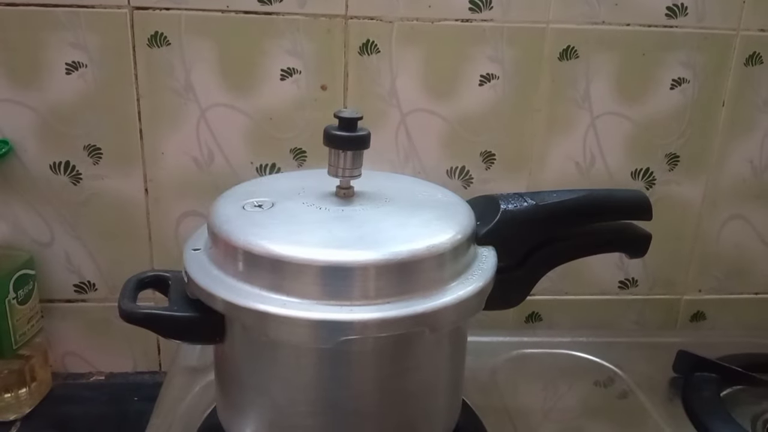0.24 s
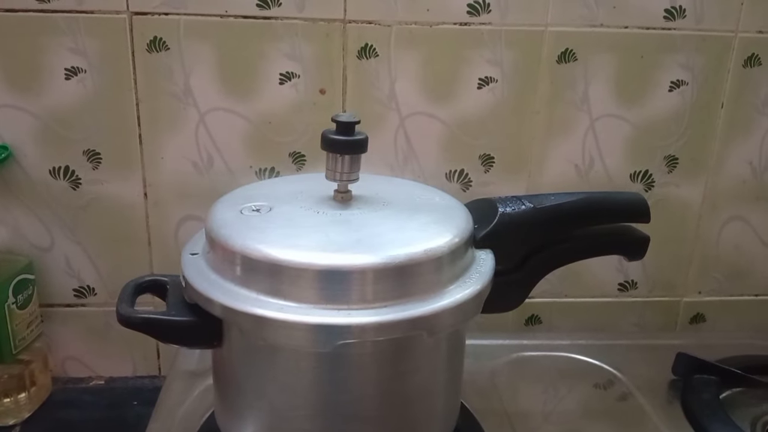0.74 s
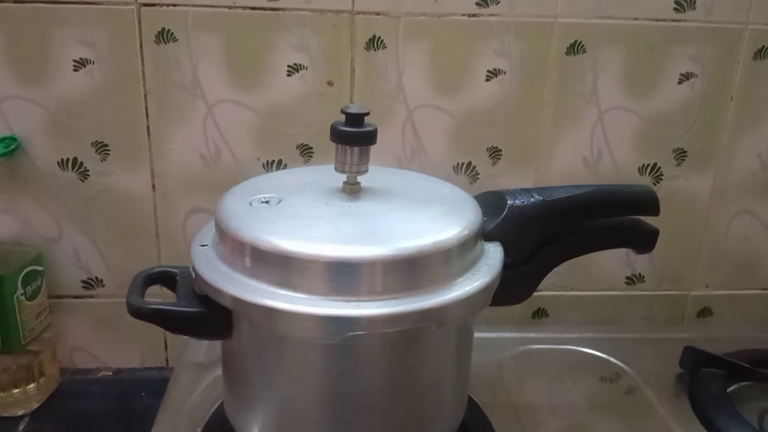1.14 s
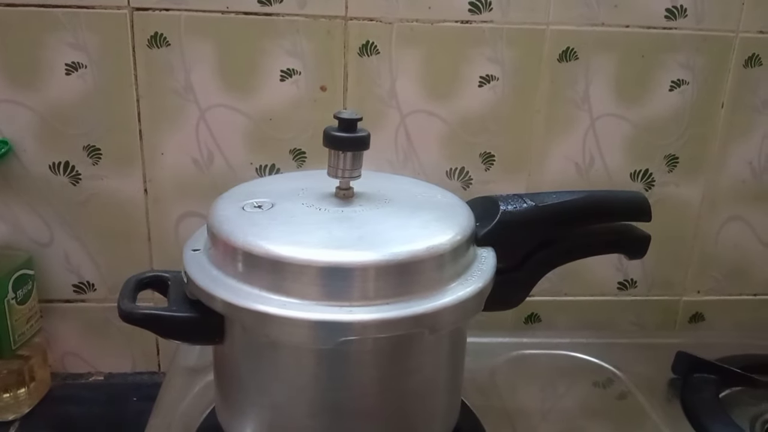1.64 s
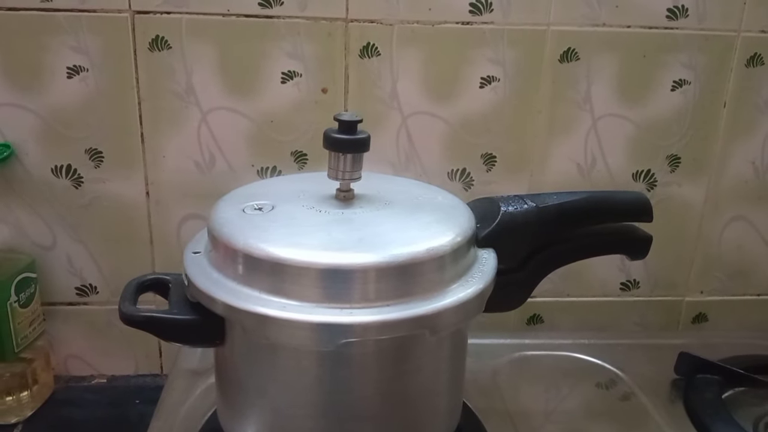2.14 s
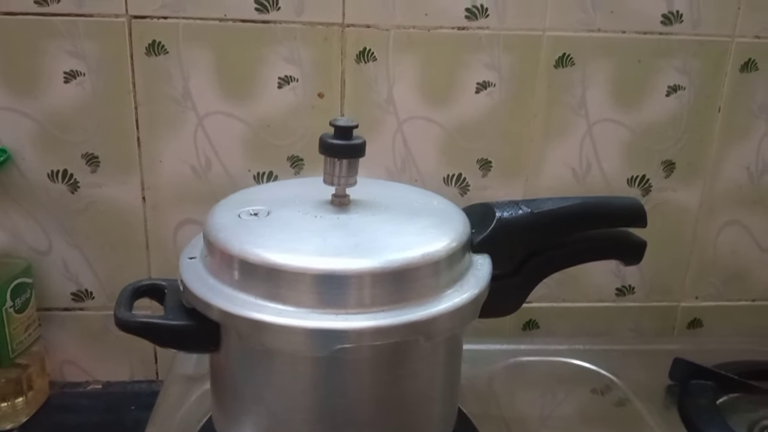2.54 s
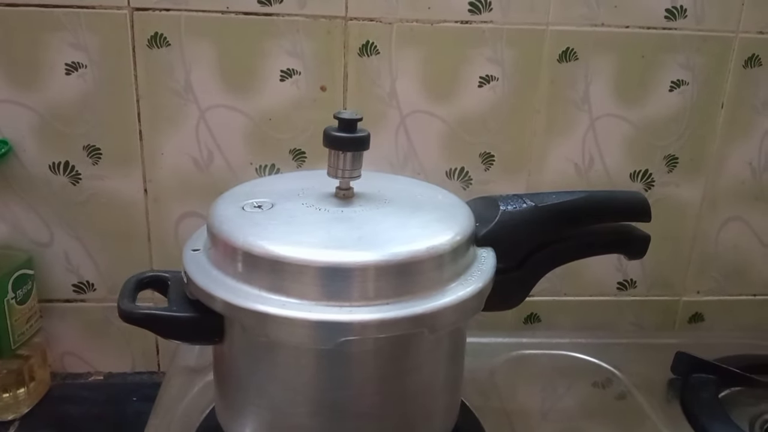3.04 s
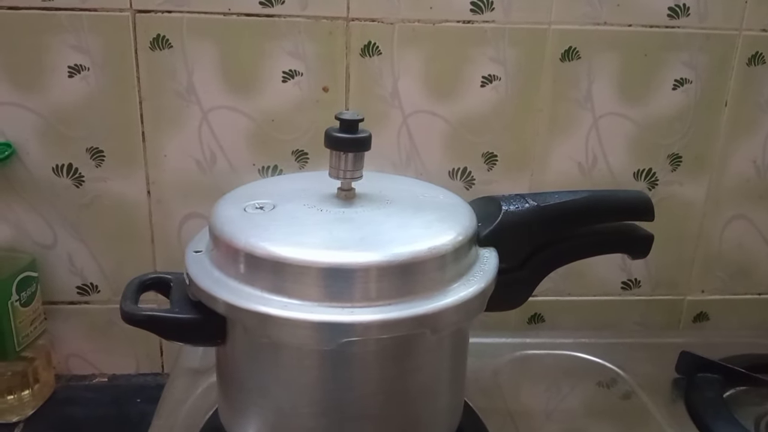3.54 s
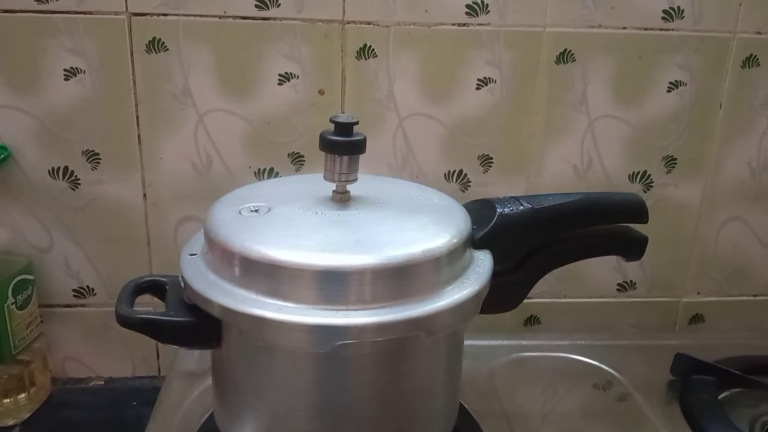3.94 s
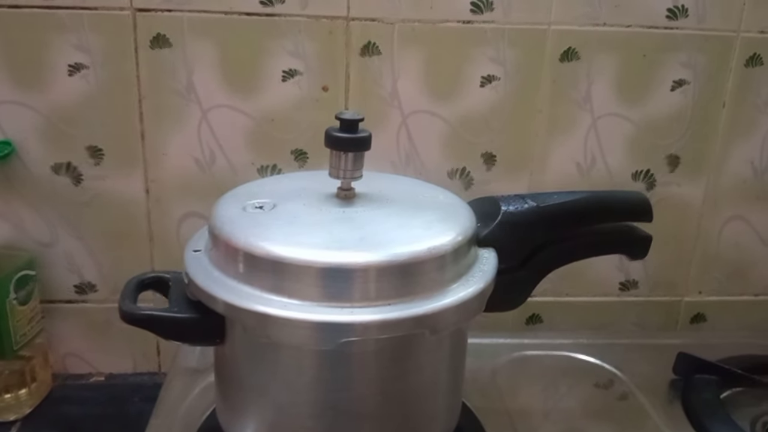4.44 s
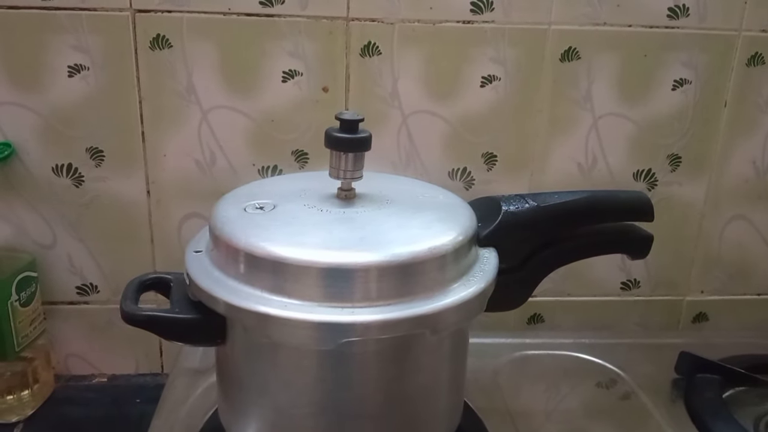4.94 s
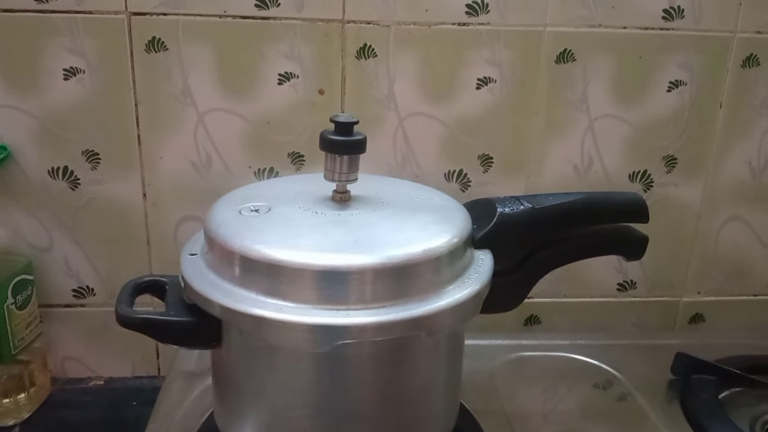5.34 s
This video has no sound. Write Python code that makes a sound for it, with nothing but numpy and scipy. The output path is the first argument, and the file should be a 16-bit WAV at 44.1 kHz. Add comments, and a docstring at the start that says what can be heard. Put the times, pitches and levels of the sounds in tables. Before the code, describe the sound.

A pressure cooker blasts bright, hoarse steam hisses over and over, each swelling fast, holding, then cutting off to a short silence.

```python
"""A small tiled kitchen, close up and in mono: a pressure cooker vents through its weight valve.
Shaped noise makes the hissing steam jet, and resonances driven by noise make the hoarse whistle and thin singing.
Low noise peppered with droplets makes the wet rush; short decaying pops, thuds and spits make the sputter.
One and the same blast returns every second and a half: it starts faintly, swells, holds, fades and stops.
The scene opens inside one blast and ends while another fades."""
import sys
import numpy as np
from scipy import signal
from scipy.fft import rfft, irfft, next_fast_len
from scipy.io import wavfile
from scipy.ndimage import map_coordinates

SR = 44100
rng = np.random.default_rng(int(sys.argv[2]) if len(sys.argv) > 2 else 0)


def materialize(psi):
    """Save the field psi as 16-bit PCM at rate SR to the path in sys.argv[1].

    A 1-D psi becomes a single channel; in a 2-D psi each row is a channel.
    """
    bounded = np.clip(np.atleast_2d(psi).T, -1, 1)
    quanta = np.round(bounded * 32767).astype(np.int16)
    wavfile.write(sys.argv[1], SR, quanta)


N = 246078


def amp(db):
    """Turn decibels into gain."""
    return 10 ** (np.asarray(db) / 20)


def unit(x):
    """Scale a sound to rms 1."""
    return x / np.sqrt(np.mean(x ** 2) + 1e-20)


def curves(rows):
    """Draw each column after the time as a curve with one value per sample."""
    times, *columns = np.transpose(rows)
    return [np.interp(np.arange(N) / SR, times, column) for column in columns]


def wobble(rate):
    """Draw a smooth random curve with `rate` knots a second."""
    knots = rng.standard_normal(int(N * rate / SR) + 4)
    return map_coordinates(knots, [np.arange(N) * rate / SR])


def filtered(x, response):
    """Multiply the spectrum of x by a gain that depends on frequency in Hz."""
    size = next_fast_len(N + SR // 2)
    gain = response(np.fft.rfftfreq(size, 1 / SR))
    return irfft(rfft(x, size) * gain, size)[..., :N]


def coloured(x, spectrum):
    """Shape x by a spectrum drawn on a log frequency axis, then scale it to rms 1."""
    freqs, levels = np.transpose(spectrum)
    return unit(filtered(x, lambda hz: amp(np.interp(np.log(hz + 1), np.log(freqs), levels))))


def tiles(x, wet_db=-7, t60=0.13):
    """Hard walls close behind the cooker add dense early echoes: a decaying noise tail, t60 in seconds."""
    t = np.arange(SR // 5) / SR
    tail = rng.standard_normal(len(t)) * amp(-60 * t / t60) * (t > .002)  # 2 ms before the first echo
    echo = signal.fftconvolve(x, tail / np.linalg.norm(tail))[:N]
    return (x + amp(wet_db) * echo) / np.hypot(1, amp(wet_db))


# Colour of the wet rush under the jet: (frequency [Hz], relative level [dB])
RUSH_COLOUR = [(18, -43), (30, -28), (109, -2), (211, -3.5), (538, -3.5), (583, -3.5), (786, -4),
               (1850, -4.5), (3500, -6.5), (4550, -22), (7700, -120)]


def wet_rush(level_db, droplet_rate=900, droplet_db=-3, churn_db=1.4):
    """Coarse eddies rumble, peppered with droplets (droplet_rate a second) that burst in the nozzle."""
    droplets = (rng.random(N) < droplet_rate / SR) * rng.standard_normal(N)
    drive = rng.standard_normal(N) + amp(droplet_db) * unit(droplets)
    churning_level = amp(level_db + churn_db * wobble(60))
    return churning_level * coloured(drive, RUSH_COLOUR)


# Strong spurts of water in the blast that repeats:
# (time [s], strength [dB], pop pitch [Hz], pop decay by 60 dB [cycles])
WATER_SPURTS = [(1.311, -20.5, 132, 6.1), (1.336, -23.5, 123, 5), (1.422, -15.5, 270, 5),
                (1.445, -14, 193, 2.7), (1.495, -21, 280, 5), (1.558, -14, 158, 2.5),
                (1.647, -18, 200, 3.7), (1.705, -16, 121, 3), (1.727, -21, 283, 6.2), (1.983, -25, 122, 4),
                (2.034, -20.5, 270, 3.9), (2.271, -21, 160, 8), (2.441, -18.5, 204, 2.5),
                (2.473, -20, 113, 2.6)]


def spurts(thud_hz=85, thud_db=-12, thud_t60=0.051, spit_db=-14, spit_t60=0.018, low_cut_hz=66):
    """Each slug of water leaves with a short pop, a push of air and a spit of spray."""
    out = np.zeros(N + SR)
    t = np.arange(SR // 5) / SR
    for start, strength_db, hz, cycles in WATER_SPURTS:
        pop_shape = amp(-60 * t * hz / cycles) * (1 - np.exp(-2 * t * hz))
        pop = np.sin(2 * np.pi * hz * t) * pop_shape
        thud_shape = amp(thud_db - 60 * t / thud_t60) * (1 - np.exp(-2 * t * thud_hz))
        thud = np.sin(2 * np.pi * thud_hz * t) * thud_shape
        spit = rng.standard_normal(len(t)) * amp(spit_db - 60 * t / spit_t60)
        out[round(start * SR):][:len(t)] += amp(strength_db) * (spit - pop - thud)
    # the microphone's low cut removes the deep bass
    low_cut = signal.butter(4, low_cut_hz, "high", fs=SR, output="sos")
    return signal.sosfilt(low_cut, out[:N])


# Narrow resonances that sing through the hiss: (frequency [Hz], relative level [dB])
SINGING_LINES = [(6535, -42), (6681, -44), (7219, -49.5), (7483, -48), (7795, -46.5), (7951, -47),
                 (8258, -49.5), (8570, -55.5), (8775, -48.5), (9162, -51), (9324, -40.5), (9857, -41)]


def singing(level_db, width_hz=24):
    """High-Q resonances ring in the turbulence as thin, wavering tones."""
    def lines(f):
        power = sum(amp(2 * db) / (1 + (2 * (f - hz) / width_hz) ** 4) for hz, db in SINGING_LINES)
        return np.sqrt(power)
    return amp(level_db) * unit(filtered(rng.standard_normal(N), lines))


# Resonances of the valve cavities: (centre [Hz], width [Hz], relative level [dB])
VALVE_RESONANCES = [(3500, 300, -9.5), (6520, 960, -2), (7540, 26, -3), (8250, 320, -19), (8950, 140, -2.5),
                    (9440, 96, 0), (10140, 170, -7), (14600, 160, -8)]


def whistle(level_db, flutter_db=1.0):
    """Turbulence drives each valve resonance hoarsely; none locks into a pure tone."""
    voice = np.zeros(N)
    for centre, width, db in VALVE_RESONANCES:
        band = lambda f: 1 / (1 + (2 * (f - centre) / width) ** 2)
        fluttering_level = amp(db + flutter_db * wobble(49))
        voice += fluttering_level * filtered(rng.standard_normal(N), band)
    return amp(level_db) * unit(voice)


# Colour of the free steam jet: (frequency [Hz], relative level [dB])
JET_COLOUR = [(1470, -25), (2500, -15.5), (3320, -9.5), (4530, -11.5), (4970, -11.5), (5530, -9),
              (6540, -2.5), (7860, -7), (9080, -5), (10200, -4.5), (12300, -18.5), (13400, -25.5),
              (13900, -33), (14600, -8.5), (15500, -18)]


def jet(level_db, flutter_db=0.42, air_db=-18):
    """Fine turbulence at the nozzle makes a bright hiss over a faint, even wash of air."""
    hiss = coloured(rng.standard_normal(N), JET_COLOUR)
    air = amp(air_db) * rng.standard_normal(N)
    return amp(level_db + flutter_db * wobble(45)) * (hiss + air)


PERIOD = 1.5093  # s from one blast to the next
FAINT_S, SWELL_EASE = 0.047, 1.28  # s for the faint start to build; exponent, above 1 swells quickly at first
# Level of each repeat, one row a blast:
# (starts [s], faint start level [dB], starts to fade [s], nearly silent [s], stops [s])
BLAST_LEVELS = [(-.342, -16, 1.043, 1.068, 1.103), (1.167, -16, 2.5, 2.6, 2.613),
                (2.676, -16, 4.022, 4.09, 4.122), (4.174, -29, 5.5, 5.6, 5.63)]


def repeated(sound, swell_s, last_db):
    """The same sound comes round once a period; each time it starts faintly, swells, holds, fades and stops."""
    t, out = np.arange(N) / SR, np.zeros(N)
    for k, (starts, faint_db, fades, nearly_silent, stops) in enumerate(BLAST_LEVELS):
        faint = amp(faint_db) * np.clip((t - starts) / FAINT_S, 0, 1)
        swell = 1 - np.clip(1 - (t - starts - FAINT_S) / swell_s, 0, 1) ** SWELL_EASE
        rise = faint + (1 - faint) * swell
        fade = np.interp(t, [fades, nearly_silent], [1, amp(last_db)]) * (t < stops)
        # the sound is laid out in time for the second blast (k = 1)
        out += rise * fade * np.roll(sound, round((k - 1) * PERIOD * SR))
    return out


# Reference level of the steam [dB] and its slow gain as the jet dries [dB/s]
STEAM_DB, STEAM_DB_PER_S = -23.75, .45
# Wetness of the rush during the blast that repeats: (time [s], relative level [dB])
RUSH_WETNESS = [(1.4, -36), (1.954, -38.5), (2.0, -36.5), (2.08, -40.5), (2.204, -40), (2.224, -35),
                (2.37, -39.5), (2.5, -38)]


def scene():
    """Steam and water leave the valve together; both channels hear the same."""
    blast_s = np.clip(np.arange(N) / SR - BLAST_LEVELS[1][0], 0, PERIOD)  # time into the second blast
    steam_db = STEAM_DB + STEAM_DB_PER_S * blast_s
    rush_db, = curves(RUSH_WETNESS)
    hiss = tiles(jet(steam_db - 0.5) + whistle(steam_db - 8.5), wet_db=-9, t60=0.079)
    steam = hiss + singing(steam_db - 10.5)
    water = wet_rush(rush_db + 2.5, churn_db=1.37) + spurts()
    steam_blasts = repeated(steam, swell_s=0.23, last_db=-12.0)
    water_blasts = repeated(water, swell_s=0.18, last_db=-19.0)
    return np.tile(steam_blasts + water_blasts, (2, 1))


TOP_HZ = 15560  # nothing passes above this


def record(dry):
    """The microphone fades out over the 150 Hz below its band limit and keeps nothing above it."""
    return filtered(dry, lambda hz: np.clip((TOP_HZ - hz) / 150, 0, 1))


dry = scene()
out = record(dry)
materialize(out)
```